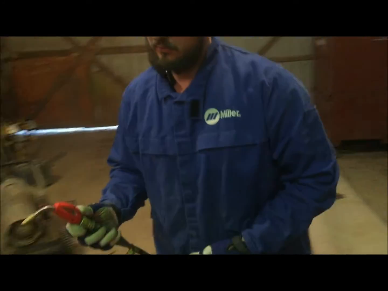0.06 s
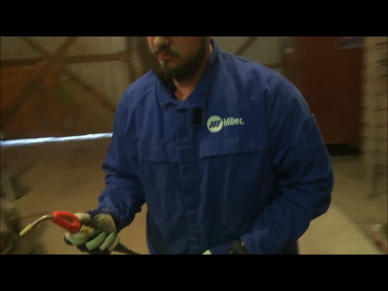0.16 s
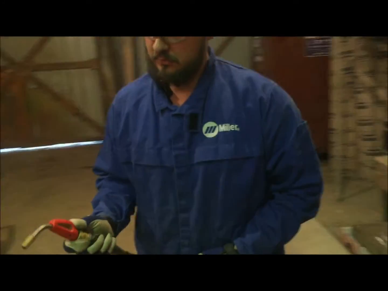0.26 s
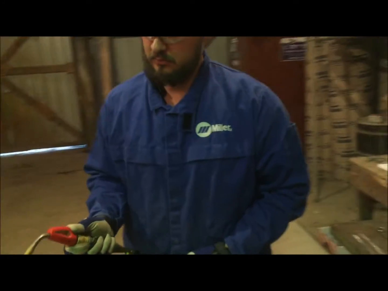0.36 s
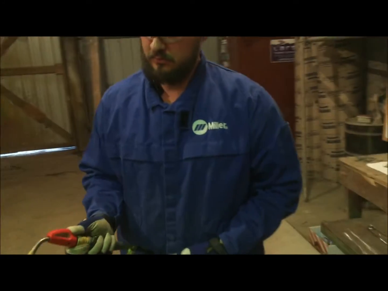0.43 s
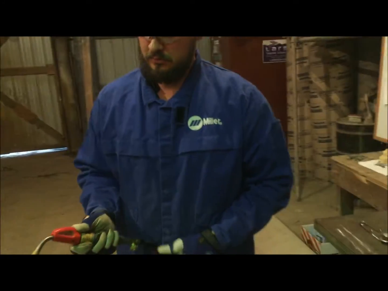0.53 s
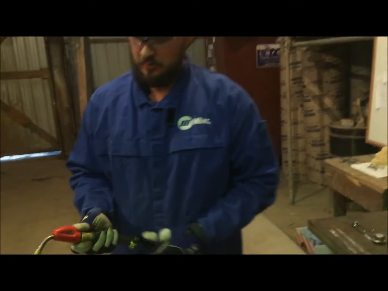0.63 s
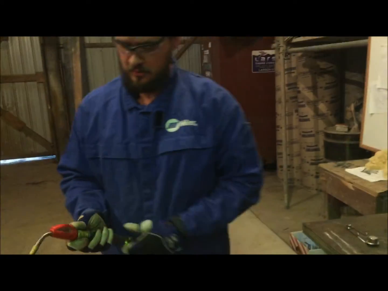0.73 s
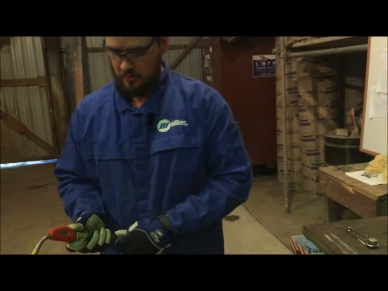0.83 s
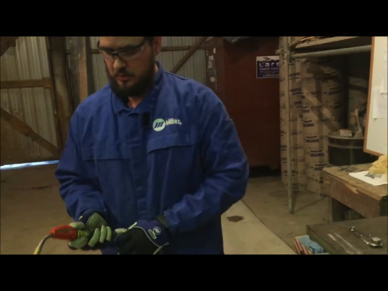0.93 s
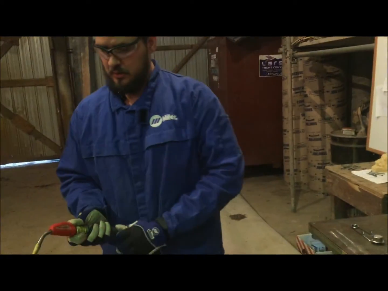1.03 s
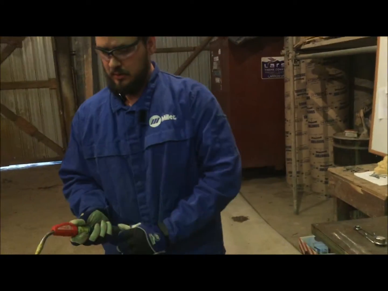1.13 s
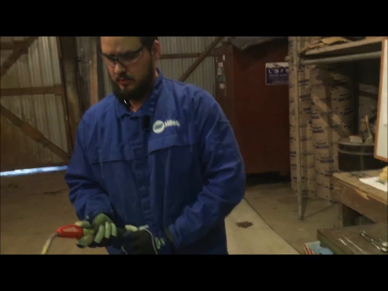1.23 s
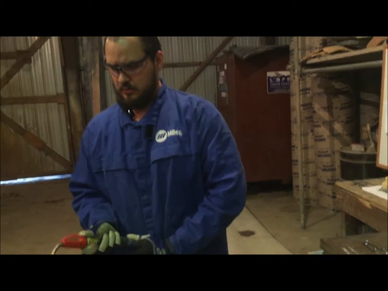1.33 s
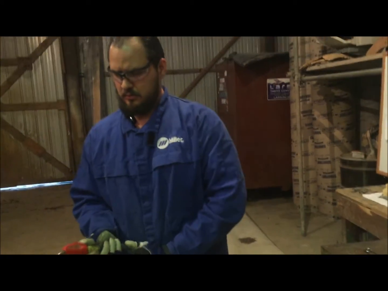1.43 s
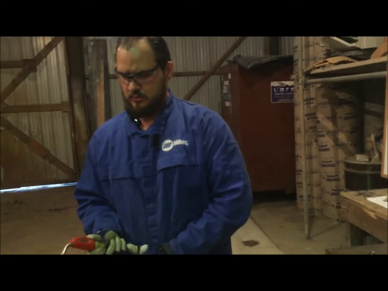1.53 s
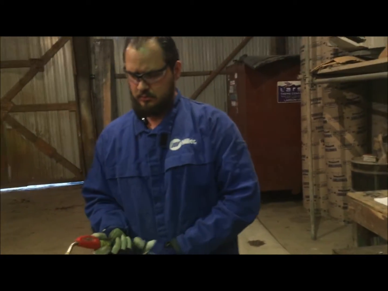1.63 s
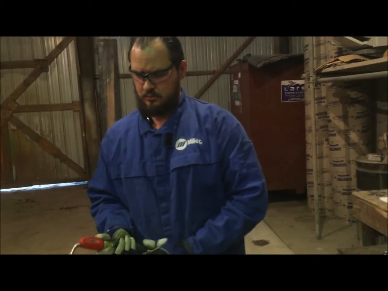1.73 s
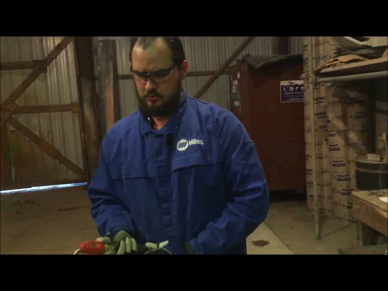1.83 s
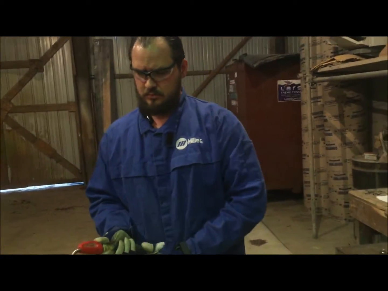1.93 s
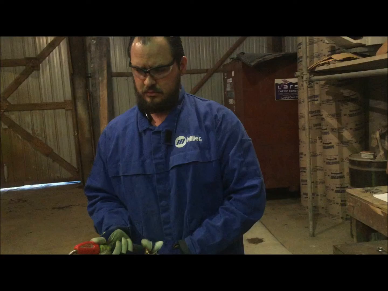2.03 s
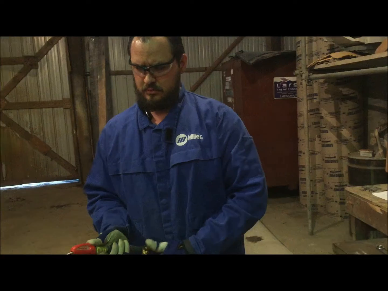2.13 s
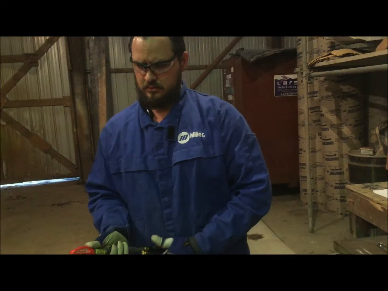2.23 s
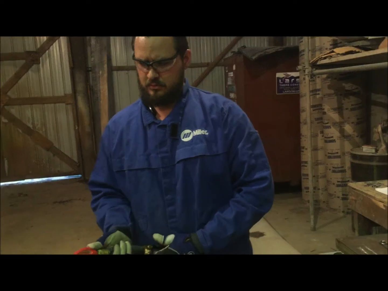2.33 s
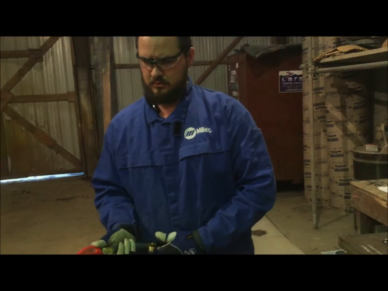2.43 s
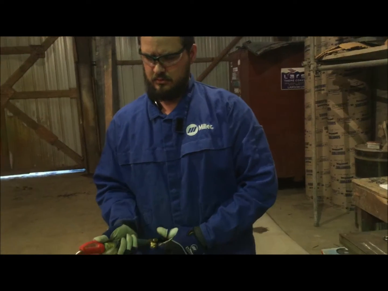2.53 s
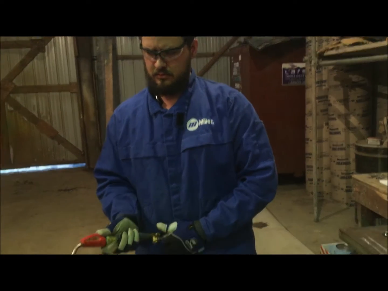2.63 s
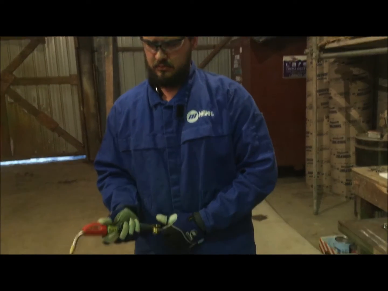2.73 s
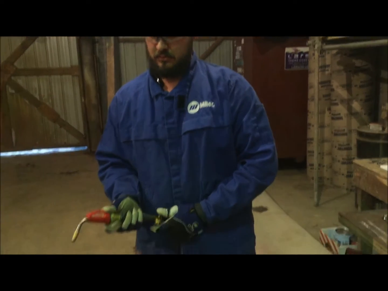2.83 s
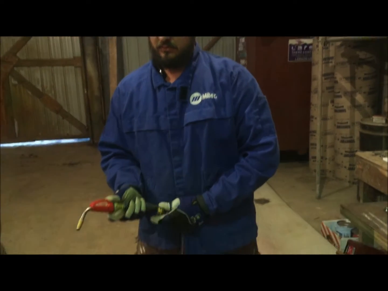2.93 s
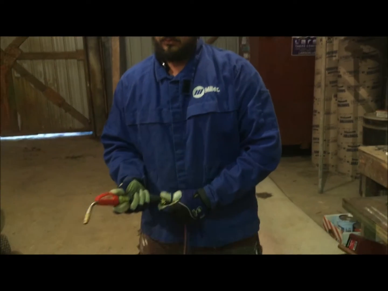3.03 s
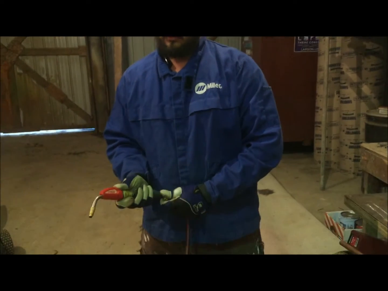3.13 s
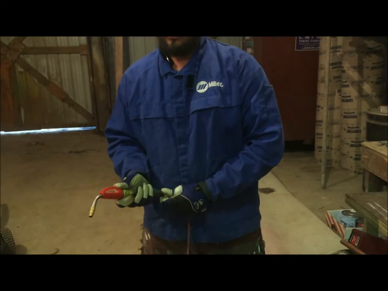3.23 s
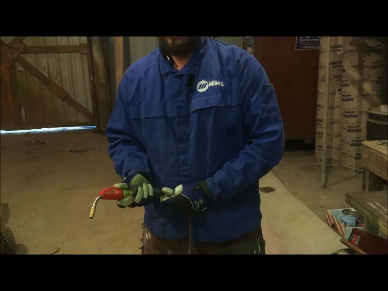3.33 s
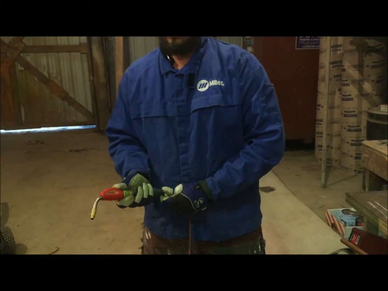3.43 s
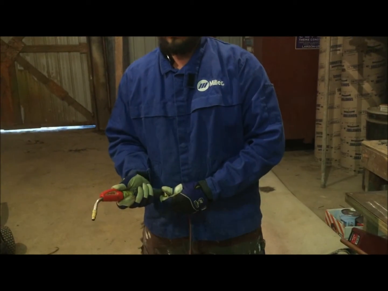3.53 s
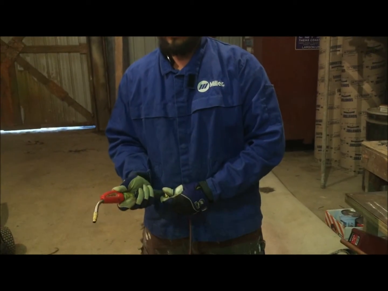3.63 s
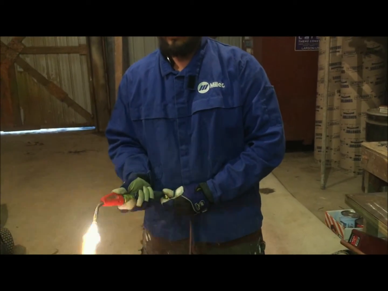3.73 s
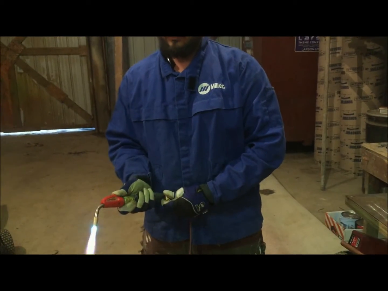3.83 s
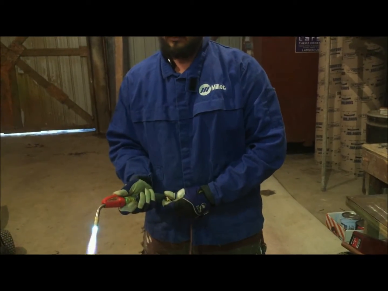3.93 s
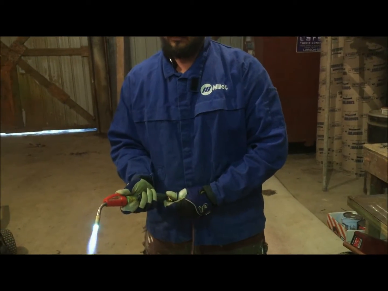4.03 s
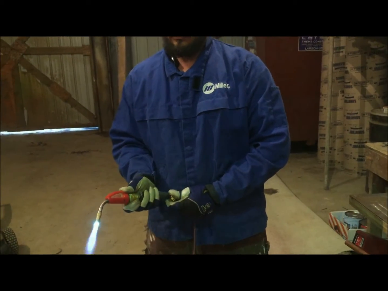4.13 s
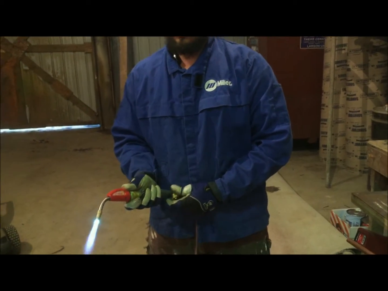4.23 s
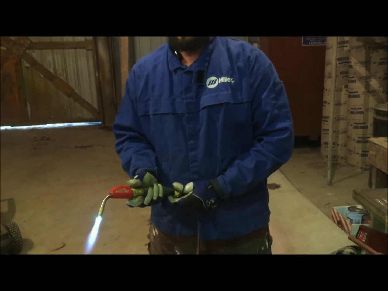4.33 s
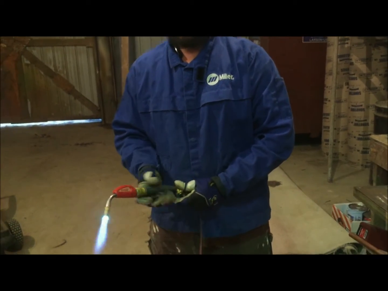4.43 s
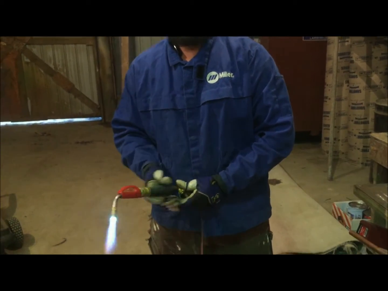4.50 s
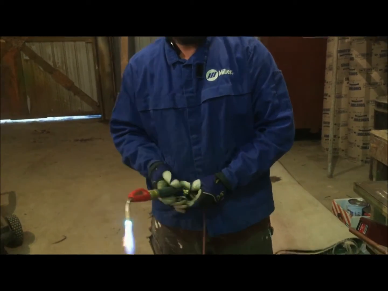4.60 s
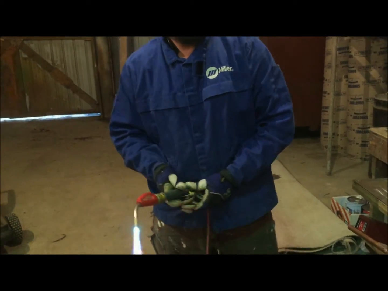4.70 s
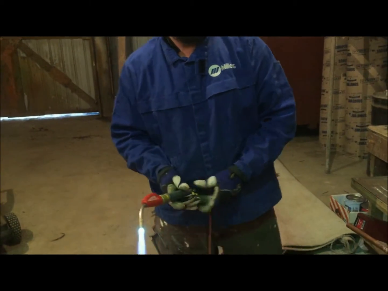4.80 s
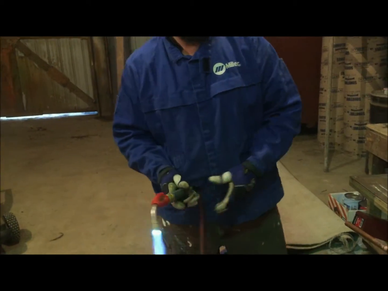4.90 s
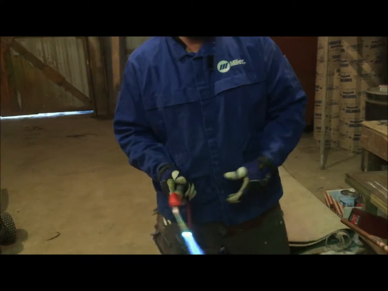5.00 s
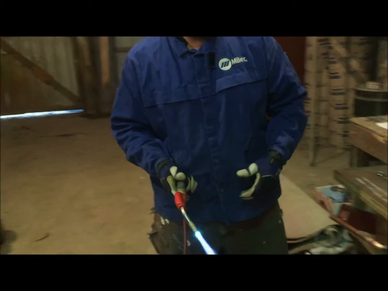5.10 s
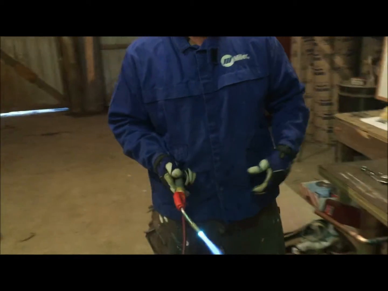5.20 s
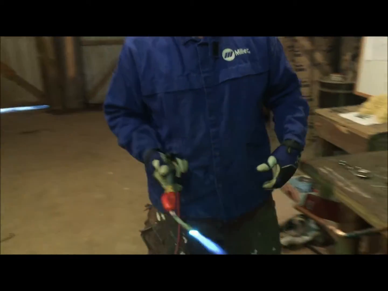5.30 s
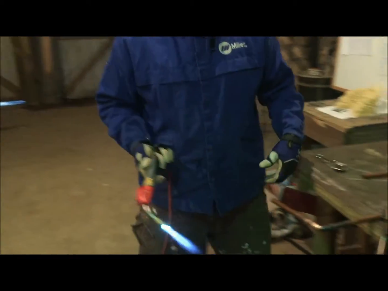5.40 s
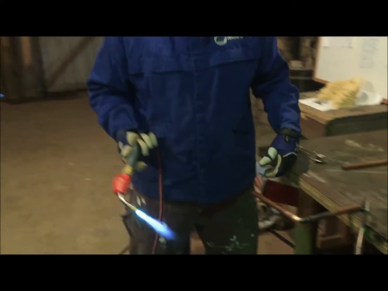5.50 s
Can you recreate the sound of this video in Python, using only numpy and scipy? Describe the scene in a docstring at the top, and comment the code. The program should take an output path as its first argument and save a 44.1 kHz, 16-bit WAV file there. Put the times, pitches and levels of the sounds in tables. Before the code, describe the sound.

Close to the microphone in a reverberant steel workshop, gloves rustle and small metal parts click over a low machine hum, with one very loud snap early on. Thin gas hiss begins, then a sharp pop echoes without lighting. After more hissing, a second pop ignites a steady, bright roar with a piercing whistle that breaks up as the torch turns.

```python
"""A steel workshop, where a gas torch is handled close to one microphone. A machine hums low and gloves rustle,
both made from filtered noise (the hum also has a wavering tone). Small metal contacts ring like struck modes,
and one is the loud snap of a fitting. Gas hisses through the burner tube's resonances. The igniter pops once
in vain, then lights a roaring flame of coloured noise with a whistle that swoops and holds.
Each pop is a crackle and a pressure pulse, and the hall rings after it."""
import sys
import numpy as np
from scipy import signal
from scipy.fft import rfft, irfft, next_fast_len
from scipy.io import wavfile
from scipy.ndimage import uniform_filter1d, map_coordinates

SR = 44100
rng = np.random.default_rng(int(sys.argv[2]) if len(sys.argv) > 2 else 0)


def wav_out(sig):
    """Save sig, one row per channel (or a flat mono array), as 16-bit PCM at SR to the path in sys.argv[1]."""
    wavfile.write(sys.argv[1], SR, np.round(np.clip(np.atleast_2d(sig).T, -1, 1) * 32767).astype(np.int16))


N = 245195
TIME = np.arange(N) / SR  # seconds

# Loudness of the machine hum. Each row: time in seconds, level in dB.
HUM_LEVEL = [(0.0, -57), (0.3, -43.5), (2.2, -44.5), (2.65, -46), (2.8, -52.5), (4.15, -50.5), (4.5, -57),
             (5.45, -67), (5.56, -68)]
# Colour of the air in the hall. Each row: frequency in Hz, relative strength in dB per Hz.
HALL_AIR_COLOUR = [(15, -44.5), (25, -15.5), (86, -2), (158, -11), (224, -9.5), (450, -24), (691, -21),
                   (856, -26), (4870, -43.5), (6540, -43), (15000, -56.5)]
# How fast the hall's echoes die. Each row: frequency in Hz, time to fall by 60 dB in seconds.
HALL_DECAY = [(80, 0.8), (200, 0.52), (700, 0.94), (2500, 0.6), (6000, 0.39), (14000, 0.26)]

# Gloves and jacket rubbing. Each row: start in seconds, length in seconds, level in dB,
# crispness in dB and thud in dB, both relative to that level.
RUBS = [(0.045, 0.07, -64, -15, 9), (0.127, 0.089, -46.5, -8.5, -5.5), (0.233, 0.1, -59, -11.5, -10),
        (0.713, 0.032, -45, -31.5, 3.5), (0.755, 0.041, -43.5, -15.5, -2), (0.807, 0.1, -65, -23, 4),
        (0.917, 0.18, -52, -9, -7.5), (1.054, 0.25, -60, -5.5, 1.5), (1.383, 0.033, -57.5, -23, 1)]
# Colour of the dull cloth noise. Each row: frequency in Hz, relative strength in dB per Hz.
CLOTH_COLOUR = [(900, -17), (1400, -10), (1750, -2), (2050, -4), (2400, -1), (2800, -2.5), (3200, 0),
                (3700, -3), (4400, -9), (5200, -20), (9000, -45)]
# Resonances that sing in crisp strokes. Each row: frequency in Hz, width in Hz, relative level in dB.
CRISP_MODES = [(5550, 550, 1), (6280, 700, 2), (8000, 480, 1.5), (9380, 690, -2), (11770, 830, -7),
               (14000, 1800, -12)]
RUB_RISE, RUB_FALL = 0.45, 0.52  # rise time, and added release time (60 dB fall), as shares of the rub's length
LET_GO_S = 0.057  # shortest release time (60 dB fall)
TAIL_DB, TAIL_S = -16, 0.67  # the room's tail after a rub: level next to the stroke, and time to fall 60 dB

# Tones in a hollow knock nearby. Each row: frequency in Hz, relative level in dB, time to fall 60 dB in seconds.
KNOCK_TONES = [(200, -8, .1), (435, 1, .07), (575, 1, .17), (825, -10, .1), (1320, -19, .14)]
# The knock and its bounce. Each row: time in seconds, level in dB.
KNOCKS = [(.068, -29), (.123, -37)]

# Small metal contacts, with the igniter's tick before each pop.
# Each row: time in seconds, peak of the direct ring in dB, treble limit in Hz.
CLICKS = [(0.224, -33.5, 9000), (.246, -35.5, 9040), (0.428, -40.5, 12000), (0.4715, 1.5, 19570),
          (0.682, -35, 3490), (0.7229, -34, 2980), (0.7646, -30.5, 5000), (.7835, -35, 3960),
          (0.7883, -29, 9140), (1.402, -41, 5000), (1.427, -55, 20100), (2.6496, -34.5, 1490),
          (3.079, -23, 14400), (3.9545, -29, 1490)]
# The torch fittings that the clicks ring. Each row: frequency in Hz, width in Hz, typical level in dB.
FITTING_MODES = [(1500, 900, -10), (2250, 200, -6), (3020, 260, 6), (3200, 30, 2), (4250, 300, -3),
                 (5150, 450, 0), (6430, 450, -1), (7400, 600, 0), (8770, 300, 0), (9580, 500, 1),
                 (11700, 900, -4), (13700, 900, 0)]
# A short rasp on something hard. The row: start in seconds, length in seconds, level in dB,
# frequency in Hz, width in Hz.
RASP = (.764, .021, -35.5, 2330, 600)

VALVE_S, OPENING_S, GAS_DB = 1.71, 0.075, -51  # when the valve opens, how long it takes, level of the tube's hiss
# Resonances of the cold burner tube. Each row: frequency in Hz, width in Hz, relative level in dB.
COLD_TUBE_MODES = [(604, 140, -5.5), (1008, 62, -3), (3550, 98, 0), (3967, 90, -2), (4370, 350, -0.5),
                   (5540, 34, -4), (7070, 120, -8), (8490, 290, 1.5), (9780, 98, -7), (11160, 110, -6.5),
                   (12200, 230, -7.5), (13300, 180, -8.5)]
# Where the jet's sound cancels. Each row: frequency in Hz, width in Hz, strength of the cancelling part in dB.
TUBE_GAPS = [(9400, 400, 5), (10400, 480, -6.5), (11500, 250, -12)]
# Two treble bands of the nozzle. Each row: time in seconds, upper band level in dB, lower band level in dB.
NOZZLE_LEVELS = [(1.7, -52.5, -58), (1.9, -52, -57.5), (2.2, -52.5, -76), (2.55, -59, -59.5),
                 (3.1, -57, -65), (3.4, -54, -73), (3.95, -56, -70)]

# The two pops. Each row: time in seconds, level in dB that scales all parts of the pop.
POPS = [(2.6725, 3), (3.9769, 4)]
# What goes with each pop. Each row: hall level in dB, added fade in dB per second, thump level in dB,
# with both levels relative to the pop.
POP_TAILS = [(17.5, -2.5, -7.5), (17.5, 22, -7.5)]
# Colour of a pop in the hall. Each row: frequency in Hz, relative strength in dB per Hz.
BLAST_COLOUR = [(40, -35.5), (100, -7.5), (190, 2.5), (270, -5.5), (360, -0.5), (500, -6), (800, -2),
                (1200, -4), (2400, -5.5), (4700, -20.5), (15500, -30.5)]
# The tube's colouring of the burst. Each row: frequency in Hz, width in Hz, relative level in dB.
POP_RING_MODES = [(637, 28, -3.5), (955, 25, 12), (1200, 50, 4), (2436, 140, 11.5), (3200, 180, -4.5)]

# Flame loudness as the torch turns. Each row: time in seconds, roar level in dB, fizz level in dB.
FLAME_LEVELS = [(4.022, -25.5, -46.5), (4.046, -22, -44.5), (4.5, -18.5, -37.5), (4.62, -19.5, -39.5),
                (4.96, -26.5, -45.5), (5.05, -22, -37), (5.1, -21, -30), (5.18, -20, -35.5),
                (5.42, -23.5, -36), (5.56, -22, -39.5)]
BODY_DB = -26.5  # the low part of the roar keeps this level, apart from the flutter
# Colour of the roar. Each row: frequency in Hz, relative strength in dB per Hz.
ROAR_COLOUR = [(35, -57), (60, -2), (381, -21), (680, -20), (790, -11), (1300, -15.5), (2360, -9),
               (3280, 1.5), (3510, 2), (4570, -8), (6490, -12), (11500, -27), (15000, -57)]
# Resonances of the hot burner tube. Each row: frequency in Hz, width in Hz, relative level in dB.
HOT_TUBE_MODES = [(375.4, 21, -11.5), (800, 16.6, -5), (2130, 6.5, 1), (3120, 21, 0), (4037, 50, 5),
                  (5690, 51, -4.5), (6730, 660, -8.5), (8420, 560, -8.5), (9580, 840, -7)]
# A lower mode swells once. The row: frequency in Hz, width in Hz, middle of the swell in seconds,
# half-length in seconds, level in dB.
LOW_NOTE = (2110, 60, 5.28, .06, -30)

# The whistle swoops while the flame settles. Each row: time in seconds, pitch in Hz, level in dB.
SWOOP = [(4.02, 4300, -29), (4.033, 4420, -20.5), (4.044, 4148, -16), (4.048, 3502, -16),
         (4.053, 3060, -11), (4.067, 3480, -15), (4.073, 3900, -16), (4.087, 4080, -14), (4.093, 4030, -15),
         (4.095, 3530, -14), (4.112, 3480, -13), (4.125, 3650, -14)]
SWOOP_UNREST = .6  # unrest runs from 0 to 1
# Stretches where the whistle holds. Each row: start in seconds, end in seconds, pitch in Hz, level in dB,
# unrest from 0 to 1.
HOLDS = [(4.021, 4.454, 3620, -13, .27), (4.463, 4.682, 3622, -12.5, .27), (4.808, 4.864, 3612, -14, .33),
         (4.874, 4.968, 3612, -14.5, .33), (4.984, 5.023, 3620, -18, .45), (5.045, 5.078, 3620, -15.5, .45),
         (5.107, 5.14, 3615, -17, .45), (5.158, 5.188, 3595, -17, .45), (5.223, 5.272, 3605, -13.5, .45),
         (5.295, 5.342, 3595, -14, .45), (5.358, 5.414, 3590, -13.5, .45), (5.43, 5.567, 3555, -16.5, .55)]
SLIPPED = (3565, -21, .6)  # the note between holds: pitch in Hz, level in dB, unrest from 0 to 1
GRIP_S = .01  # time to catch or lose the held note

TOP_HZ = 15750  # band limit of the input


def amp(db):
    """Turns dB into a gain."""
    return 10 ** (np.asarray(db) / 20)


def unit(x):
    """Scales a sound to an average (rms) level of 1."""
    return x / np.sqrt(np.mean(x ** 2) + 1e-20)


def along(points, hz):
    """Reads values between (Hz, value) points on a log frequency axis."""
    point_hz, values = np.transpose(points)[:2]
    return np.interp(np.log(hz + 1), np.log(point_hz + 1), values)


def curves(rows):
    """Turns each column after the time into one value per sample."""
    seconds, *columns = np.transpose(rows)
    return [np.interp(TIME, seconds, column) for column in columns]


def wobble(rate):
    """Draws a smooth random curve through rate random points a second."""
    points = rng.standard_normal(int(N * rate / SR) + 4)
    return map_coordinates(points, [TIME * rate])


def filtered(x, response):
    """Multiplies the spectrum of x by a response, a function of frequency in Hz."""
    size = next_fast_len(len(x) + SR // 2)
    hz = np.fft.rfftfreq(size, 1 / SR)
    return irfft(rfft(x, size) * response(hz), size)[:len(x)]


def resonances(modes, hz):
    """Adds up modes (Hz, width, dB) that ring after a push, with alternating sign."""
    total = 0
    for k, (centre, width, db) in enumerate(modes):
        push = 1j * hz * width
        total = total + (-1) ** k * amp(db) * push / (centre * centre - hz * hz + push)
    return total


def band(lo_hz, hi_hz, hz):
    """Gives a band of frequencies with soft edges."""
    return (hz / lo_hz) ** 3 / np.sqrt((1 + (hz / lo_hz) ** 6) * (1 + (hz / hi_hz) ** 6))


def rush(response, patchy_db):
    """Makes coloured noise of rms 1, with random louder and softer patches in time and pitch."""
    spectrum = signal.stft(rng.standard_normal(N), nperseg=512)[2]
    patches = uniform_filter1d(rng.standard_normal(spectrum.shape), 6, 0)
    patches = unit(uniform_filter1d(patches, 10, 1))
    noise = signal.istft(spectrum * amp(patchy_db * patches), nperseg=512)[1][:N]
    return unit(filtered(noise, response))


def hall(sound, gap_s=0.0016):
    """Echoes a sound with a new random tail of energy 1; each frequency dies at its own speed."""
    hz, t, spectrum = signal.stft(rng.standard_normal(SR), SR, nperseg=256)
    fade = amp(-60 * t / along(HALL_DECAY, hz)[:, None])
    tail = signal.istft(spectrum * fade, SR, nperseg=256)[1]
    delayed = np.pad(sound, (round(gap_s * SR), 0))
    return signal.fftconvolve(delayed, tail / np.linalg.norm(tail))


def add(track, s, sound):
    """Mixes a sound into the track at s seconds."""
    part = track[round(s * SR):][:len(sound)]
    part += sound[:len(part)]


def machine_hum():
    """A low tone with wavering pitch, plus noise through a low resonance."""
    hz = 78 + 1.04 * wobble(4.5)
    tone = np.sqrt(2) * np.sin(2 * np.pi * np.cumsum(hz) / SR)
    rumble = rush(lambda hz: resonances([(70.7, 12.0, 0)], hz), patchy_db=4.5)
    return amp(curves(HUM_LEVEL)[0]) * unit(tone + 0.47 * rumble)


def hall_air():
    """Coloured noise for the air of the hall, with a faint high whine of narrow-band noise."""
    air = rush(lambda hz: amp(along(HALL_AIR_COLOUR, hz)), patchy_db=2.0)
    whine = rush(lambda hz: resonances([(6500, 120, 0)], hz) ** 2, patchy_db=3)
    return amp(-50.0) * air + amp(-75.5) * whine


def cloth_rubs():
    """Cloth rubs in clumps of tiny scratches; crisp strokes reach the treble, heavy ones thud."""
    scratches = amp(2.2 * wobble(400) + 1.2 * wobble(70))
    dull = unit(scratches * rush(lambda hz: amp(along(CLOTH_COLOUR, hz)), patchy_db=2.5))
    crisp = unit(amp(0.82 * wobble(270)) * rush(lambda hz: resonances(CRISP_MODES, hz), patchy_db=0.0))
    thud = unit(scratches * rush(lambda hz: band(190, 1100, hz), patchy_db=0.5))
    track = np.zeros(N)
    for s, length, db, crisp_db, thud_db in RUBS:
        rise = np.clip((TIME - s) / (RUB_RISE * length), 0, 1)
        after = np.maximum(TIME - s - length, 0)
        stroke = rise * amp(db - 60 * after / (LET_GO_S + RUB_FALL * length))
        tail = rise * amp(db + TAIL_DB - 60 * after / TAIL_S)
        track += (stroke + tail) * (dull + amp(thud_db) * thud)
        track += stroke * amp(crisp_db) * crisp
    return track


def hollow_knocks():
    """A hollow knock and its bounce: a few tones that start together and die away."""
    track, t = np.zeros(N), TIME[:SR // 2]
    knock = np.zeros(len(t))
    for hz, db, t60 in KNOCK_TONES:
        knock += amp(db - 60 * t / t60) * np.sin(2 * np.pi * hz * t)
    knock *= 1 - np.exp(-t / 0.0015)  # soft start
    knock *= amp(2 * wobble(70)[SR:][:len(t)])  # loose parts make the ring uneven
    for s, db in KNOCKS:
        add(track, s, amp(db) * knock)
        add(track, s, amp(db - 13) * hall(knock))
    return track


def clicks():
    """Short cracks that ring the torch's fittings, with echoes from the hall."""
    track, t = np.zeros(N), TIME[:SR // 10]
    for s, db, top_hz in CLICKS:
        grit = 0.08 * amp(-60 * t / 0.004) * rng.standard_normal(len(t))
        crack = (t == 0) + grit  # one blow and a little grit
        bass_limit_hz = min(top_hz / 2, 1250)

        def small_part(hz):
            """A small part radiates little bass, and its treble is limited too."""
            return (1j * hz / (bass_limit_hz + 1j * hz)) ** 2 / (1 + 1j * hz / top_hz) ** 4

        # each contact favours other modes: only their levels vary
        modes = FITTING_MODES + rng.normal(0, 2, (len(FITTING_MODES), 1)) * [0, 0, 1]
        ring = filtered(crack, lambda hz: (resonances(modes, hz) + amp(-16.5)) * small_part(hz))
        strength = amp(db) / np.abs(ring).max()
        add(track, s, strength * ring)
        add(track, s, amp(-18.5) * strength * hall(ring, gap_s=0.0013))
        add(track, s, amp(-19.5) * strength * hall(filtered(crack, small_part), gap_s=0.003))
    return track


def rasp():
    """A short scrape on something hard: rough noise through one resonance, used twice."""
    s, length, db, hz, width = RASP
    noise = rush(lambda f: resonances([(hz, width, 0)], f) ** 2, patchy_db=1)
    scrape = unit(amp(4 * wobble(350)) * noise)
    swell = np.sin(np.pi * np.clip((TIME - s) / length, 0, 1)) ** .5
    return amp(db) * swell * scrape


def gas():
    """Jet noise through the narrow resonances of the burner tube, until it catches fire."""
    flowing = np.interp(TIME, [VALVE_S, VALVE_S + OPENING_S, 3.98, 4.0], [0, 1, 1, 0])

    def tube_colour(hz):
        """The tube's resonances, with gaps where the sound cancels."""
        return np.abs(resonances(COLD_TUBE_MODES, hz)) * np.abs(1 - resonances(TUBE_GAPS, hz))

    tube = rush(tube_colour, patchy_db=1.0)
    # the lowest strong mode sings faintly
    note_hz = 982 + 6 * wobble(30)
    note = np.sqrt(2) * amp(2.5 * wobble(9)) * np.sin(2 * np.pi * np.cumsum(note_hz) / SR)
    upper = rush(lambda hz: resonances([(15100, 1900, 0)], hz) ** 2, patchy_db=2.0)
    lower = rush(lambda hz: resonances([(12900, 850, 0)], hz) ** 2, patchy_db=3.0)
    upper_db, lower_db = curves(NOZZLE_LEVELS)
    hiss = amp(GAS_DB) * (tube + amp(-12.5) * note)
    return flowing * (hiss + amp(upper_db) * upper + amp(lower_db) * lower)


def pop_tail(fade_db):
    """The hall's answer to a pop, coloured by the blast and the tube and scaled to energy 1."""
    tail = hall(np.ones(1), gap_s=0.0026)
    t = TIME[:len(tail)]
    tail *= 1 + 2.0 * amp(-60 * t / 0.048)  # near walls answer first and loudest
    tail = filtered(tail, lambda hz: amp(along(BLAST_COLOUR, hz)))
    ring = filtered(tail, lambda hz: resonances(POP_RING_MODES, hz))
    tail += amp(-60 * t / 0.78) * ring  # the tube's colour is heard most at first
    uneven = amp(1.0 * wobble(60)[:len(tail)])  # echoes arrive in clumps
    tail *= uneven * amp(-fade_db * t)
    return tail / np.linalg.norm(tail)


def pops():
    """The mixture burns down the tube, then bursts: crackle, pressure pulse, thump, floor echo and hall."""
    track, t = np.zeros(N), TIME[:SR // 10]
    for (s, db), (hall_db, fade_db, thump_db) in zip(POPS, POP_TAILS):
        run_up = rush(lambda hz: band(160, 900, hz), patchy_db=-6.0) * (TIME < s)
        track += amp(db - 19.0 + 1300 * np.minimum(TIME - s, 0)) * run_up  # grows by 1300 dB per second
        burst = amp(6.0 - 60 * t / 0.0049) * rng.standard_normal(len(t))
        crackle = filtered(burst, lambda hz: 1 / (1 + 1j * hz / 7000))
        since = np.maximum(t - .0005, 0)
        swing = -10 * np.log(1 + since / .001)  # the swings slow down as the gas leaves
        pulse = amp(8.0 - 60 * since / 0.011) * np.sin(swing)
        # the whole cloud expands
        thump = amp(thump_db - 60 * since / 0.054) * np.sin(2 * np.pi * 190 * (t - .0021))
        add(track, s, amp(db) * (crackle + pulse + thump))
        # the floor returns little of the crackle
        add(track, s + .0052, amp(db) * (amp(-22.0) * crackle + amp(-6.0) * pulse))
        add(track, s, amp(db + hall_db) * pop_tail(fade_db))
    return track


def flame():
    """Turbulent roar coloured by the hot tube, with a high fizz, one low swell and the whistle."""
    roar_db, fizz_db = curves(FLAME_LEVELS)
    colour = lambda hz: amp(along(ROAR_COLOUR, hz)) + np.abs(resonances(HOT_TUBE_MODES, hz))
    flutter = amp(0.45 * wobble(9.2) + 0.3 * wobble(60))
    roar = rush(lambda hz: colour(hz) * band(3730, 8500, hz), patchy_db=1.73)
    body = rush(lambda hz: colour(hz) * band(172, 2310, hz), patchy_db=0.9)
    fizz = rush(lambda hz: band(11000, 17000, hz), patchy_db=1)
    hz, width, s, half_s, db = LOW_NOTE
    swell = np.exp(-((TIME - s) / half_s) ** 2)
    low_note = amp(db) * swell * rush(lambda f: resonances([(hz, width, 0)], f), patchy_db=3.5)
    fire = flutter * (amp(roar_db) * roar + amp(BODY_DB) * body + amp(fizz_db) * fizz)
    lighting = np.interp(TIME, [4.005, 4.035], [0, 1])
    return lighting * (low_note + fire + whistle())


def whistle():
    """The hot tube's note swoops, locks onto one mode and at times slips off it, weaker and mostly lower."""
    state = np.outer(SLIPPED, np.ones(N))  # pitch, level and unrest at each sample
    for start, end, *held in HOLDS:
        grip = np.clip(np.minimum(TIME - start, end - TIME) / GRIP_S + .5, 0, 1)
        state = state + grip * np.subtract(held, SLIPPED)[:, None]
    swooping = TIME < SWOOP[-1][0]
    hz, db = np.where(swooping, curves(SWOOP), state[:2])
    unrest = np.where(swooping, SWOOP_UNREST, np.clip(state[2], 0, 1))
    falter = unrest * wobble(65) ** 2  # now and then the note sags and weakens
    jitter_hz = unrest * (22 * wobble(40) + 90 * wobble(400))
    phase = 2 * np.pi * np.cumsum(hz - 35 * falter + jitter_hz) / SR
    rough_db = 2.2 * unrest * wobble(500)  # a fast roughness
    return np.sqrt(2) * amp(db - 5.5 * falter + rough_db) * np.sin(phase)


def scene():
    """Adds all the sounds; one microphone feeds both channels."""
    mono = machine_hum() + hall_air() + cloth_rubs() + hollow_knocks() + clicks() + rasp()
    mono = mono + gas() + pops() + flame()
    return np.array([mono, mono])


def record(dry):
    """The input cuts the deepest bass, clips near full scale and keeps nothing above its band limit."""
    lean = filtered(dry[0], lambda hz: 1j * hz / (25 + 1j * hz))
    clipped = lean / (1 + np.abs(lean / .93) ** 10) ** (1 / 10)  # levels off smoothly at 0.93
    limited = filtered(clipped, lambda hz: hz < TOP_HZ)
    return np.array([limited] * 2)


dry = scene()
out = record(dry)
wav_out(out)
```